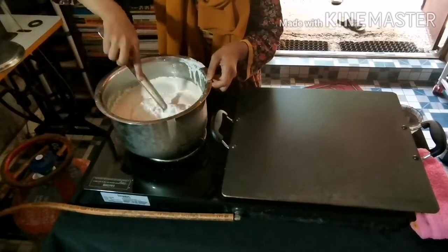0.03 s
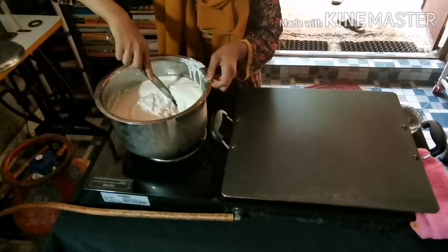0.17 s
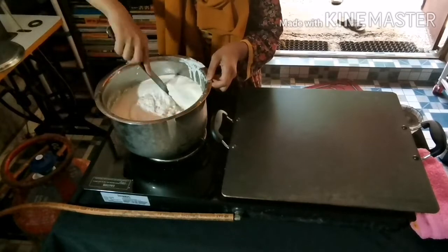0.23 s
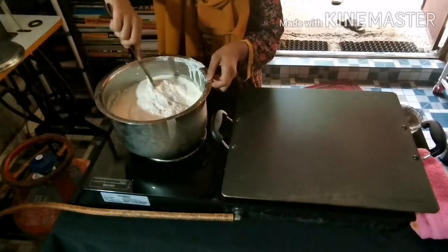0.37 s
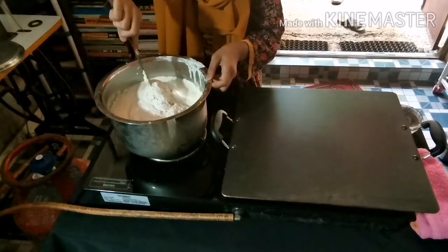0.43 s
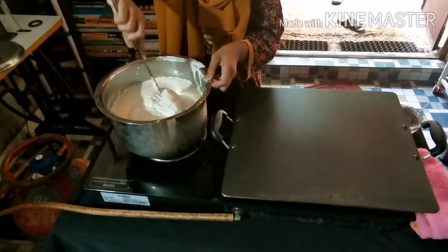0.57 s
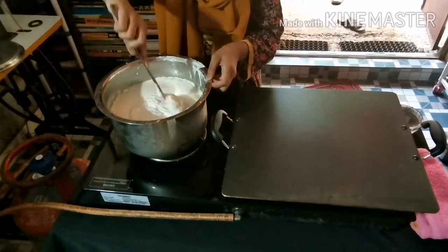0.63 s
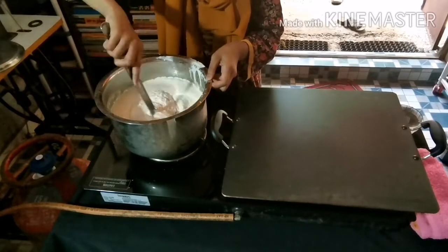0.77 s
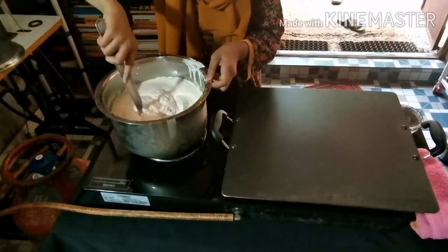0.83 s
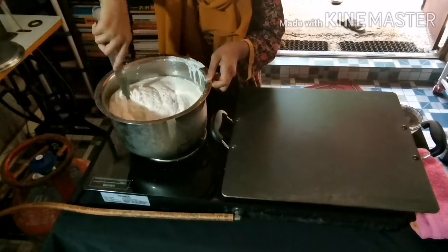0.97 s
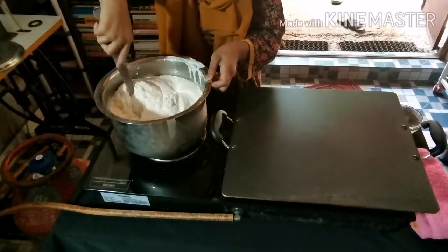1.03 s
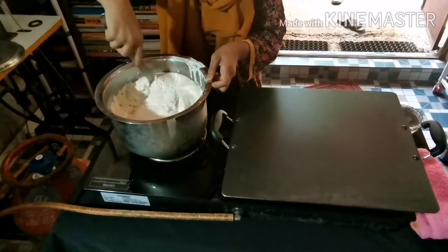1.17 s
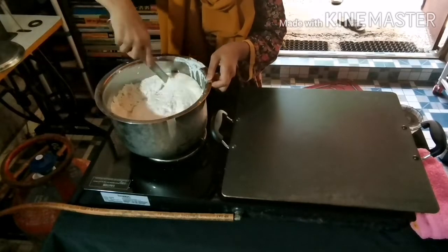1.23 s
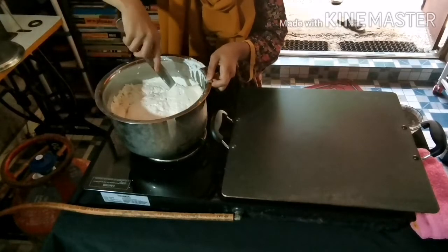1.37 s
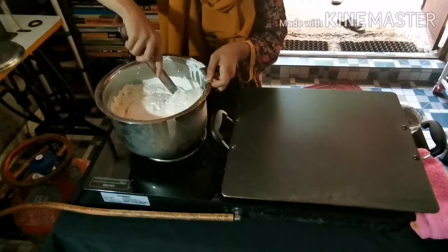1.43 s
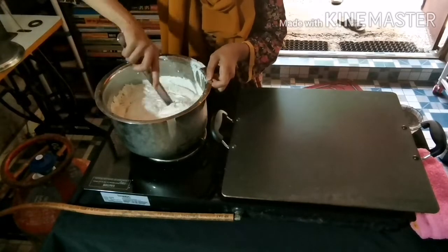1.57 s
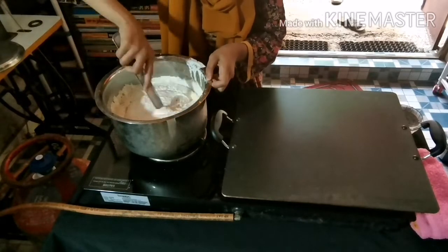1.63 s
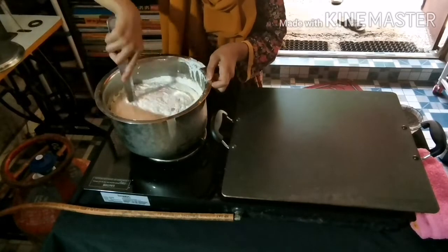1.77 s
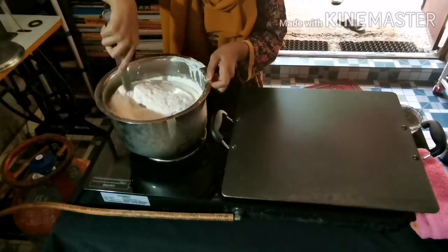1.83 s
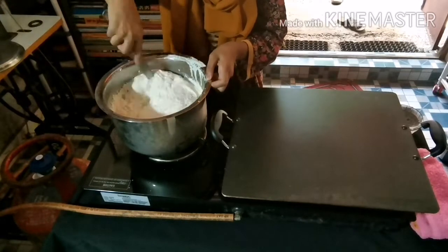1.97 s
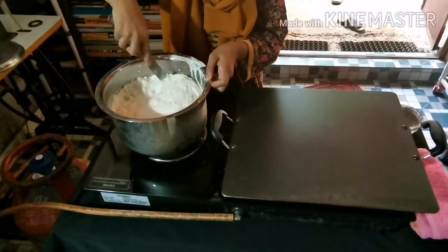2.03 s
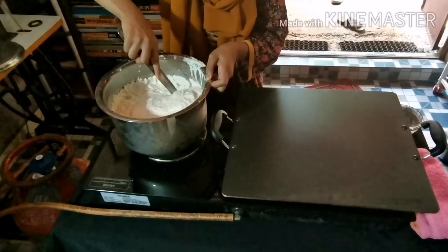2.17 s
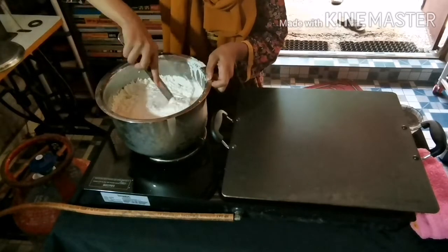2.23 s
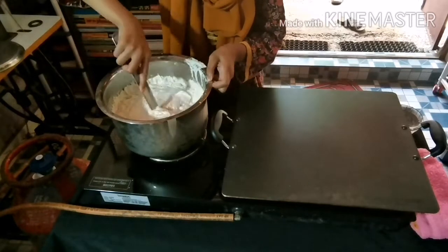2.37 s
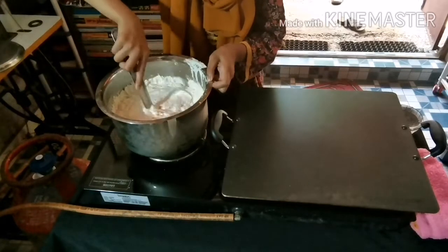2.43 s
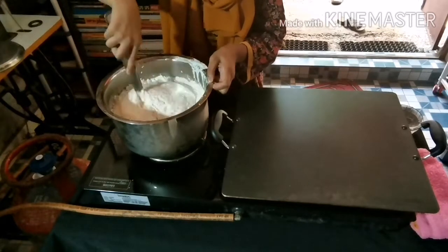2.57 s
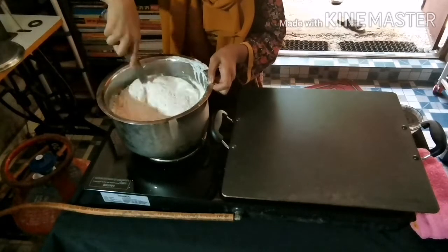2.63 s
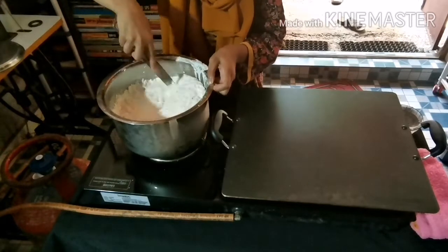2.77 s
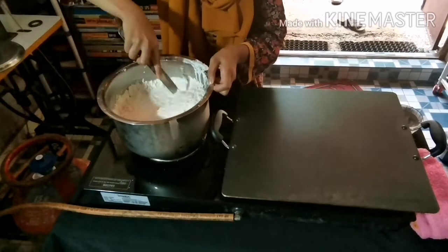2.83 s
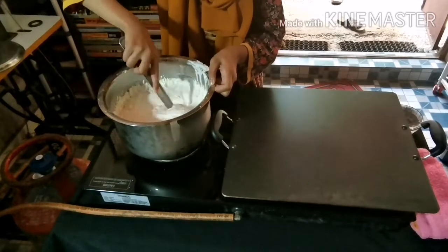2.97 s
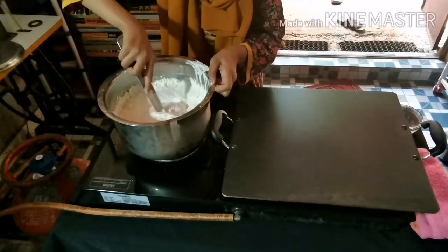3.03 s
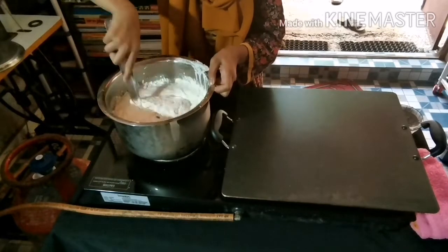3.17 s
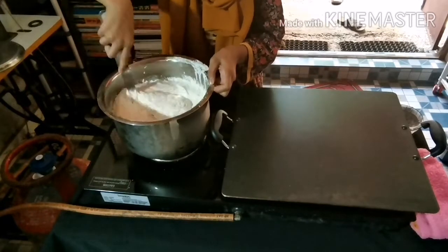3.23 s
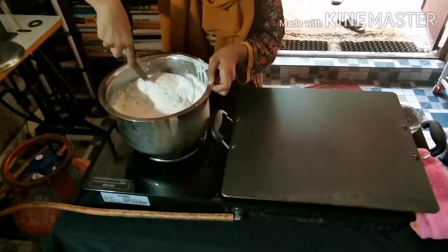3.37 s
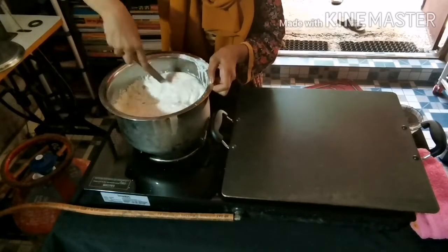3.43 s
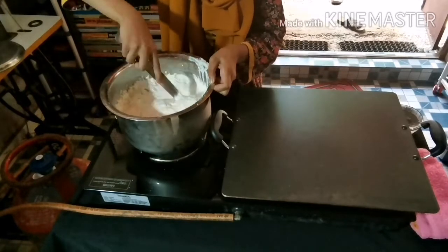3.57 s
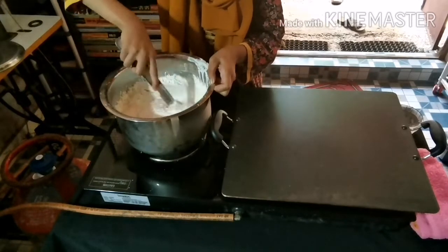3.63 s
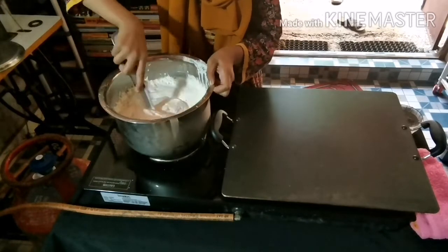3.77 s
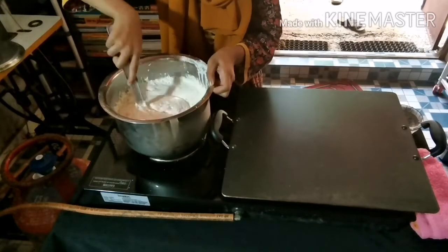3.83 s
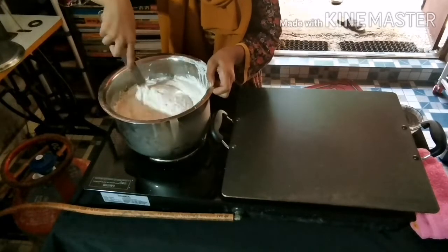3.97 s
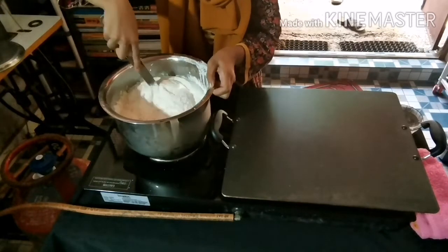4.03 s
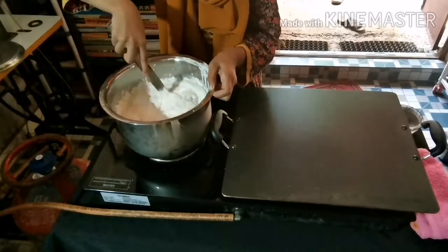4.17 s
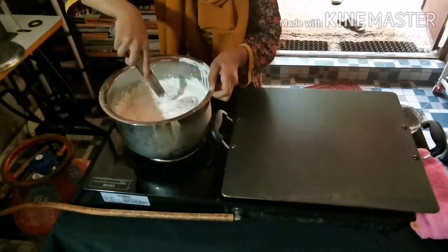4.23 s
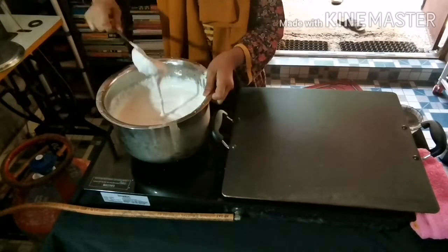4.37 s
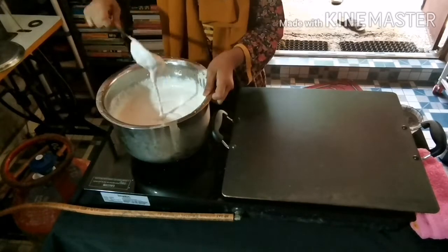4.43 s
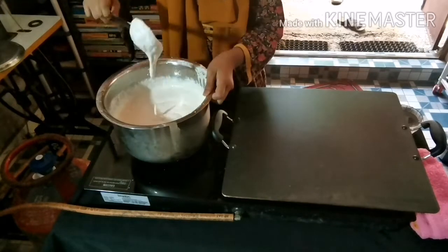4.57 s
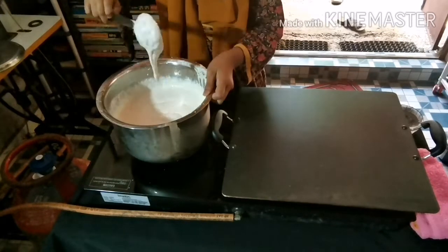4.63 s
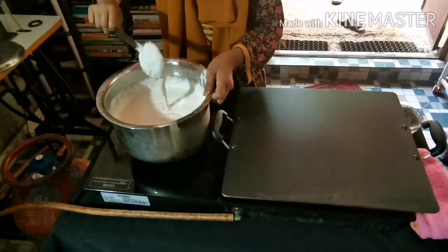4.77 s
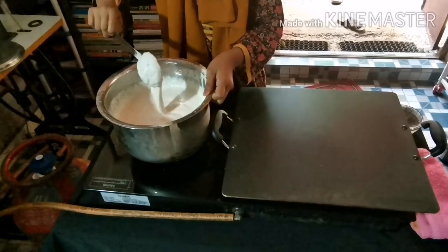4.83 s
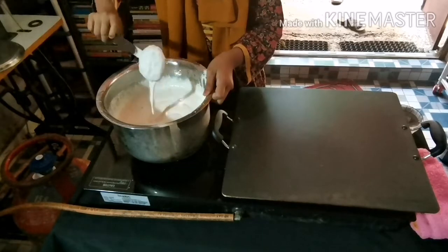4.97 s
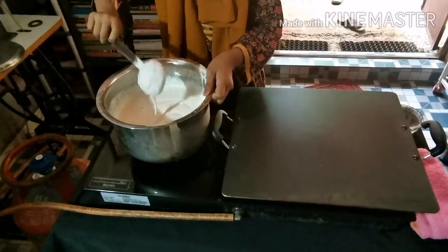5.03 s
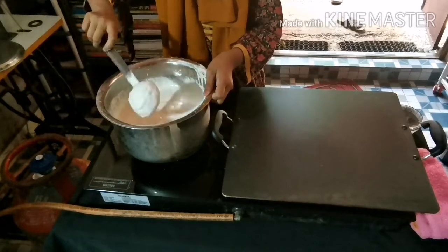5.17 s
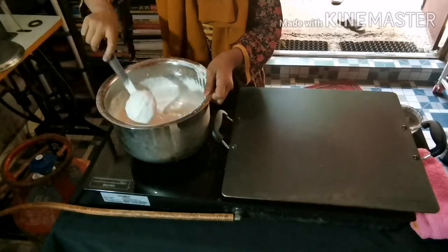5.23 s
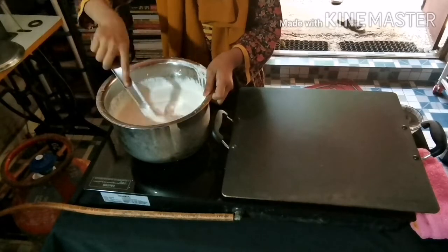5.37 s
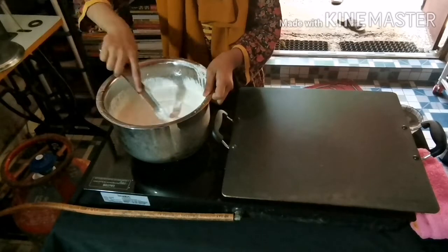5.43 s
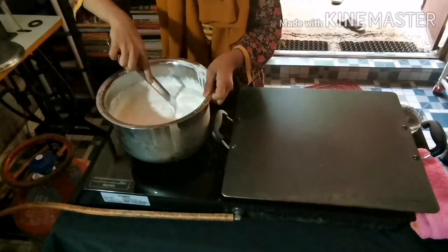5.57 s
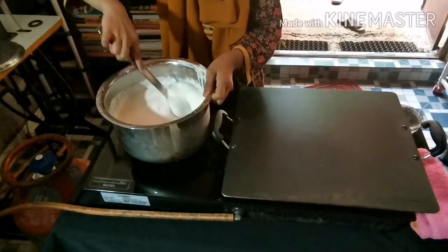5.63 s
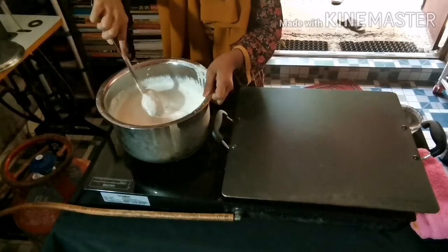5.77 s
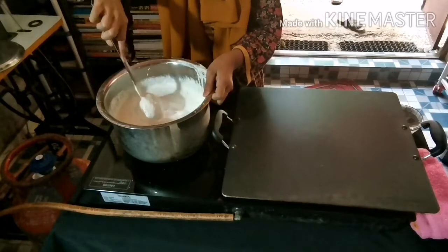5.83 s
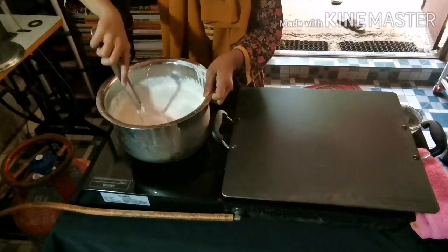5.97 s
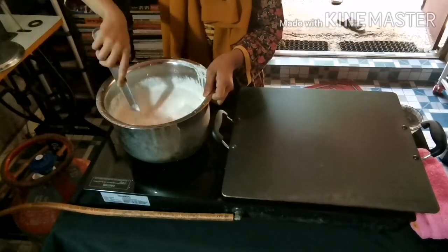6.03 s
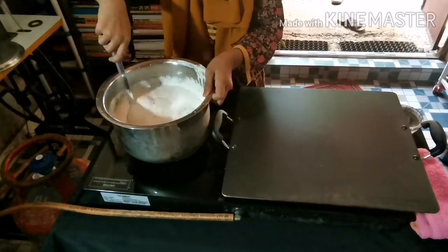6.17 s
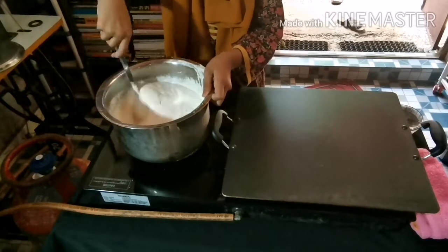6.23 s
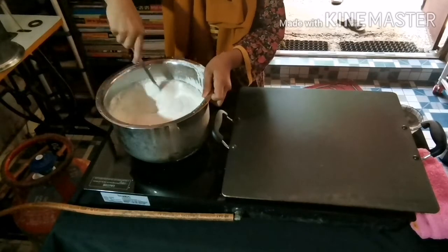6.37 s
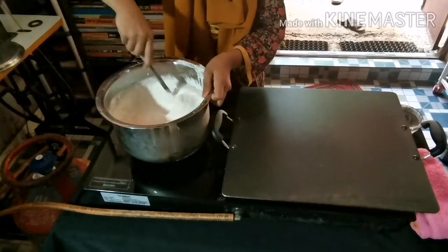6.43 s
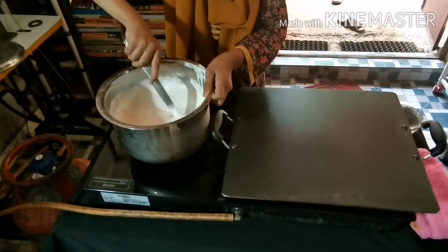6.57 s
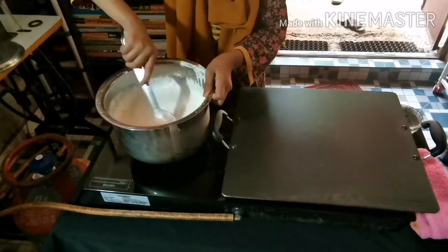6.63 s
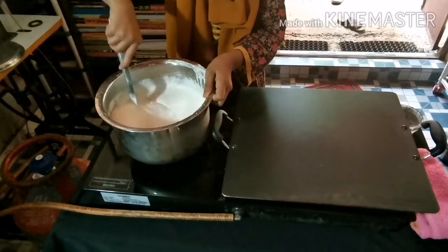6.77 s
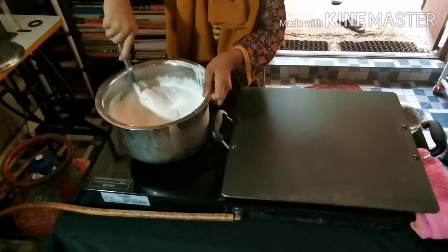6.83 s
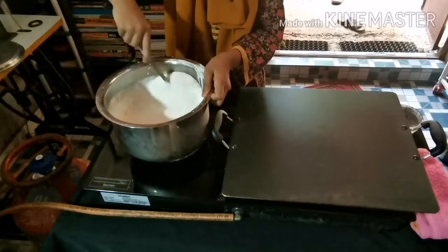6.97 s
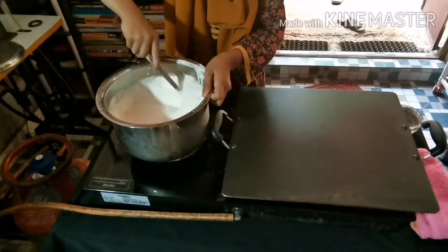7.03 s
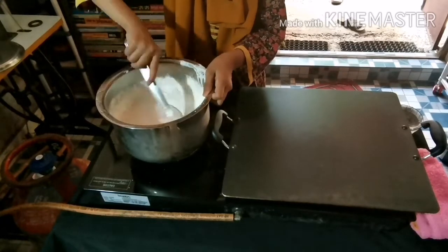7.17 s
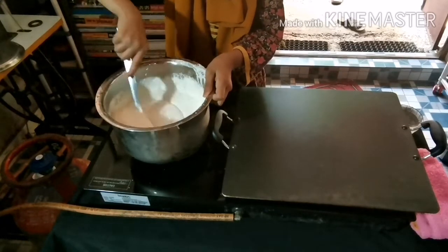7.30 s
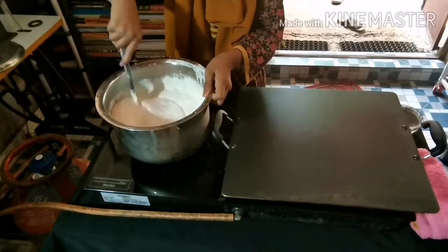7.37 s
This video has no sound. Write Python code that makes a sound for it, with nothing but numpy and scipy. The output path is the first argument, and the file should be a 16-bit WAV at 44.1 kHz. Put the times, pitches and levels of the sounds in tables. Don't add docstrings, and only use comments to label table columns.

```python
import sys
import numpy as np
from scipy import signal
from scipy.fft import rfft, irfft, next_fast_len
from scipy.io import wavfile
from scipy.ndimage import uniform_filter1d, map_coordinates

SR = 44100
rng = np.random.default_rng(int(sys.argv[2]) if len(sys.argv) > 2 else 0)


def volts_from_db(level):
    exponent = np.asarray(level, float) / 20
    return 10 ** exponent


def persist_wave(psi):
    counts = np.round(np.clip(psi, -1, 1) * 32767).astype(np.int16)
    wavfile.write(sys.argv[1], SR, np.atleast_2d(counts).T)


N = 327042

BLOW_HZ = [190, 550, 1150, 2300, 4500]
# f/Hz, level struck low/dB, level struck high on the free wall/dB, t60/s
POT = [(134, -4, 1.5, 0.15), (166, 4, -18, 0.075), (221, 3, -18, 0.062), (283, 3.5, 0, 0.038),
       (336.5, -3, -1.5, 0.097), (433, 1, -18, 0.023), (462.7, -1, -4, 0.032), (551, 0.5, -21, 0.038),
       (651, 2, 3, 0.04), (758, 5, -10, 0.025), (894.5, 4.5, 5, 0.028), (984, 2.5, -13, 0.042),
       (1035, 1, -26, 0.12), (1145, 2.5, 0.5, 0.024), (1229, -2, 1, 0.068), (1491, -11.5, -5, 0.053),
       (1574, -16, 7, 0.017), (1787, -3, -22, 0.02), (2050, -3, 2.5, 0.021), (2153, 3.5, -0.5, 0.035),
       (2284, 6.5, -4.5, 0.023), (2667, -6, 1.5, 0.021), (3060, -45, 8, 0.01), (3453, -12, 5, 0.019),
       (3554, -0.5, -21, 0.032), (3885, -8.5, 19, 0.014), (4530, -24, -4, 0.015), (4840, 0.5, -43, 0.015)]
# f/Hz, likeness (1 = same)
ALIKE = [(60, 1), (130, 1), (290, 0.87), (640, 0.69), (1400, 0.042), (4000, 0.042)]


def blows():
    # f/Hz, level/dB
    crack_colour = [(70, -11.5), (150, -5), (600, 11.5), (2300, -2.5), (4600, -1.5), (6200, -6.5),
                    (11000, -12.5), (14000, -21), (15400, -31), (16400, -46)]
    out = np.zeros((2, N + SR))
    t = np.arange(SR // 5) / SR
    hz, low_db, high_db, t60 = np.transpose(POT)[:, :, None]
    grid = np.fft.rfftfreq(2048, 1 / SR)
    small = signal.butter(3, 128, "high", fs=SR, output="sos")
    for s, *part_db in strikes():
        strike = list(zip(BLOW_HZ, part_db))
        height = np.clip((part_db[1] - part_db[0] - 7) / 9, 0, 1)
        touch = np.clip(0.00019 * volts_from_db(0.92 * (max(part_db) - part_db[-1])), 0, 0.003) + 0.0005 * height

        luck = rng.standard_normal((3, len(POT), 1))
        level_db = low_db + height * (high_db - low_db) + 1.8 * luck[0]
        fade = volts_from_db(along(strike, hz) - 1.5 + level_db - 60 * t / t60) * (1 - np.exp(-t / touch))
        phase = luck[2] * np.minimum(touch * hz * 2.25 + height * 5.3, 1.5)
        steps = np.repeat(rng.standard_normal((len(POT), 70)), 126, axis=1)
        phase = phase + np.cumsum(steps, axis=1) * hz / SR * 0.5
        ring = np.sum(fade * np.sin(2 * np.pi * hz * (1 + luck[1] / 80) * t + phase), axis=0)

        burst = volts_from_db(-60 * t / 0.013) + volts_from_db(-17.5 - 60 * t / 0.015)
        chatter = rfft(rng.standard_normal((2, len(t))) * burst)
        even = paired(irfft(chatter / np.abs(chatter), len(t)), ALIKE) * volts_from_db(-60 * t / 0.069)
        grit = ((t == 0) * 0.28 * (1 - height) + even) * volts_from_db(-4 * height)
        contact = causal(along(strike, grid) + along(crack_colour, grid) + 31)
        crack = signal.fftconvolve(grit, contact[None], axes=1)

        hit = signal.sosfilt(small, ring + crack[:, :len(t)])
        hit = signal.fftconvolve(hit, causal(blow_colour(s, grid))[None], axes=1)[:, :len(t)]
        sound = kitchen(hit[0])
        sound[:, :len(t)] += hit
        out[:, round(s * SR):][:, :sound.shape[1]] += sound
    return out[:, :N]


def strikes():
    # t/s, ring level/dB, bottom thump over ring/dB, lean from belly to rim/dB a part,
    # contact crack over ring/dB
    knocks = [(0.1937, -38.5, 10, 0.5, -21), (1.0654, -49.5, 9.5, -1, -10.5),
              (1.2336, -28.5, -9, -0.5, 2.5), (2.0344, -32.5, -4.5, -4, 2.2),
              (2.2695, -28.5, -26, 3.5, -14.5), (2.6562, -46.5, 3.5, -5, -23), (2.7595, -39, 5.5, -3, 4.5),
              (3.1542, -43.5, -2.7, -4.5, -33), (3.3488, -47.5, 15.5, -8, -27), (3.4899, -28.5, 1.5, 0, 1),
              (3.7231, -53.5, 13.5, -3, -18), (4.0933, -29, -37, -0.2, -36), (4.1382, -36, -3, -7, -33),
              (5.5007, -56, 3, -2, -4), (6.0903, -41, 12, -7.5, -35), (6.2397, -30, -13.5, 2.7, -19),
              (6.503, -25.5, 3, -2, -3.5), (6.5484, -31.5, -8.5, -2.5, -12), (6.8489, -41, 0, 11, 9.5),
              (6.8523, -25, 2.8, 2.7, -10), (6.9171, -29, -13.5, -1.3, -14.5),
              (7.054, -24.5, -3.5, -5, -5.5), (7.1019, -24.5, -17.5, 5, -13.5)]
    # t/s, level/dB, loudest f/Hz, fall an octave away/dB
    touches = [(0.0344, -53.5, 4700, 11.5), (0.8867, -57.5, 960, 3.5), (1.527, -58, 190, 4),
               (1.6662, -60, 4500, 4.5), (1.7636, -52, 810, 4.5), (1.9228, -40.5, 480, 11.5),
               (1.969, -51.5, 900, 4), (2.219, -40.5, 190, 15), (2.7121, -49.5, 700, 6),
               (2.9053, -45.5, 190, 9), (3.0481, -52, 192, 4.5), (3.2806, -53, 1300, 11),
               (3.3896, -43, 190, 5.5), (3.4382, -37, 700, 14), (3.5132, -44.5, 190, 1),
               (3.8914, -38, 533, 18), (3.949, -46.5, 870, 13.5), (4.0686, -32.5, 190, 18),
               (4.2933, -56, 4500, 9.5), (4.768, -46, 4000, 4.5), (4.9137, -46, 1900, 6.5),
               (5.115, -56, 4500, 7.5), (5.3, -56.5, 4500, 6), (5.3753, -55, 4500, 8),
               (5.766, -57, 900, 7.5), (5.9974, -42, 443, 11.5), (6.7942, -57, 400, 3.5),
               (7.1562, -41, 190, 4), (7.352, -55, 190, 4)]
    wall_dip_db, dip_per_lean = -3.5, 0.37
    full = [(s, db + thump, db - lean, db + wall_dip_db + dip_per_lean * lean, db + lean, db + crack)
            for s, db, thump, lean, crack in knocks]
    light = []
    for s, db, hz, fall in touches:
        octaves_away = np.abs(np.log2(np.divide(BLOW_HZ, hz)))
        light.append((s, *(db - fall * octaves_away)))
    return full + light


def blow_colour(s, hz):
    # blow t/s, f/Hz, level/dB
    spots = [(0.1937, 300, 12), (0.1937, 2610, -12), (1.2336, 400, -6), (1.2336, 570, -6), (1.2336, 870, 8),
             (1.2336, 2470, 7), (2.0344, 200, 10), (2.0344, 400, -6), (2.0344, 670, 8), (2.0344, 1230, -6),
             (2.2695, 420, -9), (2.2695, 1600, 7), (2.2695, 3110, -5), (2.2695, 4530, -6),
             (2.7595, 320, -8), (2.7595, 390, 10), (2.7595, 800, -11), (2.7595, 1470, -13),
             (3.1542, 250, 8), (3.1542, 370, -15), (3.1542, 760, 6), (3.4899, 220, 7), (3.4899, 410, -7),
             (3.4899, 570, -6), (3.4899, 1160, 6), (4.0933, 450, 7), (4.0933, 1040, -7), (5.5007, 200, 7),
             (5.5007, 290, -10), (5.5007, 900, -11), (5.5007, 1310, 11), (6.0903, 210, 11),
             (6.0903, 270, -7), (6.0903, 730, 9), (6.0903, 920, 7), (6.2397, 490, -8), (6.2397, 3600, 6),
             (6.503, 410, 7), (6.503, 570, -6), (6.503, 2020, -5), (6.5484, 220, -7), (6.5484, 400, -6),
             (6.5484, 1470, 11), (6.8523, 450, -8), (6.8523, 670, 6), (6.8523, 1160, 8), (6.8523, 1350, -8),
             (6.9171, 450, 10), (6.9171, 600, -9), (6.9171, 900, -6), (6.9171, 2260, -8), (7.054, 220, 7),
             (7.054, 400, 4), (7.054, 650, -5), (7.054, 4030, 5), (7.1019, 270, -6), (7.1019, 630, 9),
             (7.1019, 820, -5)]
    # blow t/s, f/Hz, level/dB
    narrow_spots = [(0.1937, 1350, 6), (0.1937, 2300, 7), (0.1937, 2540, -8), (0.1937, 3020, 8),
                    (1.2336, 3800, 5), (1.2336, 4400, -6), (1.2336, 4790, 6), (2.0344, 1450, 9),
                    (2.0344, 1820, -7), (2.0344, 2360, 7), (2.0344, 2930, -10), (2.0344, 4330, -6),
                    (2.0344, 4900, 6), (2.2695, 1270, 6), (2.2695, 3860, 10), (2.2695, 5150, 9),
                    (2.7595, 2110, 6), (2.7595, 2930, -6), (2.7595, 4150, -6), (3.4899, 1380, -8),
                    (3.4899, 1740, -7), (3.4899, 2890, -10), (3.4899, 4500, 9), (4.0933, 1740, 5),
                    (4.0933, 1990, -6), (4.0933, 2330, 8), (4.0933, 2540, -6), (4.0933, 3810, -10),
                    (4.1382, 1900, -9), (5.5007, 5080, -9), (6.0903, 1370, 10), (6.0903, 1820, -8),
                    (6.2397, 1650, 10), (6.2397, 3200, 7), (6.2397, 5150, 9), (6.503, 4400, 6),
                    (6.5484, 1330, 5), (6.5484, 2140, 6), (6.5484, 2400, -7), (6.8523, 1250, 6),
                    (6.8523, 1380, -6), (6.8523, 1670, 9), (6.8523, 2470, -5), (6.8523, 2730, 11),
                    (6.8523, 4800, 9), (6.9171, 1510, 8), (6.9171, 2580, -6), (6.9171, 2850, 7),
                    (7.054, 2610, -5), (7.054, 2850, 6), (7.1019, 1650, 7), (7.1019, 2690, 7),
                    (7.1019, 2930, -6)]
    regions = [(*row, 0.16) for row in spots] + [(*row, 0.085) for row in narrow_spots]
    near = [row[1:] for row in regions if abs(row[0] - s) < 0.006]
    return sum(db * np.exp(-0.5 * (np.log2((hz + 1) / c) / width) ** 2) for c, db, width in near) + 0 * hz


def sweet_rings():
    # t/s, f/Hz, level/dB, t60/s
    sweet = [(1.2335, 282, -36.5, 0.29), (1.2336, 780, -38, 0.26), (1.2337, 1100, -25, 0.086),
             (2.0341, 299, -36, 0.29), (2.2678, 2660, -29, 0.022), (2.2694, 699, -17, 0.031),
             (3.2811, 1420, -44, 0.048), (3.4903, 413, -29, 0.035), (4.1362, 467, -27, 0.06),
             (6.2386, 714, -25.5, 0.034), (6.2395, 2650, -26, 0.02), (6.853, 1390, -17.5, 0.04),
             (6.858, 4264, -33, 0.05), (6.8505, 3564, -30, .03), (6.503, 2330, -30, .03),
             (6.5105, 3400, -35, .02), (6.525, 2400, -33, .02), (6.543, 2750, -33, .02),
             (6.2405, 2150, -29, .03), (2.2745, 2190, -29, .04), (2.2695, 3350, -36, .02),
             (1.726, 900, -52, .03), (1.764, 950, -45, .03), (1.845, 680, -47, .07), (1.893, 800, -48, .05),
             (1.923, 760, -40, .03), (1.943, 640, -46, .04), (1.974, 720, -46, .03), (4.105, 700, -34, .03),
             (4.146, 2200, -39, .02), (4.18, 750, -39, .03), (4.197, 520, -38, .03),
             (3.4905, 4950, -38, .05), (3.4905, 2300, -33, .05), (2.0345, 3600, -40, .05),
             (2.712, 800, -44, .02), (1.0645, 900, -45, .02), (6.9175, 1155, -25, 0.035),
             (7.0548, 1010, -40, .04), (7.1023, 2220, -27, 0.021)]
    out = np.zeros(N + SR)
    t = np.arange(SR // 4) / SR
    for s, hz, db, t60 in sweet:
        fade = volts_from_db(db - 60 * t / t60) * (1 - np.exp(-t / 0.00063))
        out[round(s * SR):][:len(t)] += fade * np.sin(2 * np.pi * hz * t)
    return out[:N] + kitchen(out[:N])[:, :N]


def thuds():
    # t/s, level/dB, pitch f/Hz, ring length as a share of the grate's
    dull_blows = [(1.0651, -32.5, 121, .9), (2.219, -54, 152, .9), (2.6578, -27.5, 120.7, .9),
                  (3.1565, -36, 128, .9), (3.3907, -47, 165, .9), (4.0685, -25.5, 150, .45),
                  (5.4983, -38.5, 132.6, .9), (6.091, -27.5, 178, .9), (7.176, -34, 117, .9),
                  (7.352, -44, 124, .9)]
    # multiple of the pitch, level/dB, t60/s
    grate = [(.8, -5, 0.075), (1.02, 2.8, 0.12), (1.3, -18, .06)]
    out = np.zeros(N + SR)
    t = np.arange(SR // 4) / SR
    for s, db, hz, length in dull_blows:
        note = sum(volts_from_db(level - 60 * t / (t60 * length)) * np.sin(2 * np.pi * k * hz * t)
                   for k, level, t60 in grate)
        out[round(s * SR):][:len(t)] += volts_from_db(db) * (1 - np.exp(-t / (0.0068 * length))) * note
    out = signal.sosfilt(signal.butter(3, 88, "high", fs=SR, output="sos"), out[:N])
    return out + 0.69 * kitchen(out)[:, :N]


def drag():
    # start t/s, hold t/s, level/dB
    grinds = [(0.177, 0.03, -51.5), (1.246, .02, -47), (1.502, 0.048, -60.5), (1.74, 0.049, -60),
              (1.914, 0.027, -59), (2.075, 0.15, -58), (2.796, .02, -53.5), (3.353, 0.021, -41.5),
              (3.62, .03, -62), (3.733, 0.018, -46), (4.805, 0.018, -55.5), (5.15, 0.12, -68),
              (6.045, .02, -61), (6.293, 0.2, -62.5), (6.595, 0.1, -58), (6.91, 0.017, -53),
              (7.06, 0.074, -50)]
    # start t/s, hold t/s, level/dB, hiss over the drag/dB
    drags = [(0.097, 0.04, -60, -4), (0.212, 0.019, -53, -15), (0.484, 0.077, -67, -4),
             (0.867, 0.099, -62, -5), (1.062, 0.082, -52, -9), (1.333, 0.029, -55.5, -7),
             (1.736, 0.14, -55, -15), (1.856, .13, -52, -14), (2.112, 0.042, -57, -11),
             (2.351, .02, -50.5, -4.5), (2.47, 0.15, -66.5, 3), (2.878, 0.041, -53.5, -20),
             (3.164, 0.2, -50.5, -21), (3.596, 0.035, -54, -7), (3.847, 0.023, -59.5, -10),
             (4.119, 0.011, -39.5, -16), (4.396, 0.049, -59, -17), (4.588, 0.21, -68, 11),
             (4.928, .02, -64, -6), (5.15, .18, -74, 6.5), (6.155, 0.082, -64.5, -3),
             (6.348, 0.57, -66, -5), (6.898, 0.017, -46, -19), (7.17, .04, -66, -1), (7.27, .15, -63.5, -4)]
    # f/Hz, level/dB
    drag_colour = [(400, 0), (660, 3.5), (1300, 0), (1750, -5.5), (2200, -1)]
    press_db_per_s, ease_db_per_s = 329, 124
    out = np.zeros(N)
    # lowest Hz, highest Hz, width of the resonances, slips a second
    parts = ((99, 484, 0.16, 320), (376, 1820, 0.24, 400), (1150, 2800, 0.98, 2300))
    start, hold, db, hiss_db = np.transpose(drags)
    pressed = [np.transpose(grinds), (start, hold, db), (start, hold, db + hiss_db)]
    for rows, (lo_hz, hi_hz, width, rate) in zip(pressed, parts):
        jerk_size = volts_from_db(1.26 * np.minimum(rng.exponential(size=N), 2))
        slips = (rng.random(N) < rate / SR) * rng.standard_normal(N) * jerk_size
        rub = unit(slips) + 0.23 * rng.standard_normal(N)
        response = pot_response(lo_hz, hi_hz, width)

        def steep(f):
            edges = (1 + (lo_hz / (f + 1)) ** 4) * (1 + (f / hi_hz) ** 4)
            return response(f) * volts_from_db(along(drag_colour, f)) / edges

        pressure = gestures(*rows, press_db_per_s, ease_db_per_s)
        out += pressure * volts_from_db(-5.0 + 1.8 * wobble(25)) * unit(filtered(rub, steep))
    return out + kitchen(out)[:, :N]


def pot_response(lo_hz, hi_hz, width):
    part = [(c, db) for c, db, *_ in POT if lo_hz < c < hi_hz]
    return lambda f: sum((-1) ** k * volts_from_db(db) * 1j * f * width * c / (c * c - f * f + 1j * f * width * c)
                         for k, (c, db) in enumerate(part))


def squeals():
    # start t/s, end t/s, first f/Hz, last f/Hz, level/dB
    tones = [(0.292, 0.683, 3050, 2980, -70.5), (0.838, 1.072, 2110, 2030, -64.5),
             (0.912, 1.054, 2990, 2940, -73), (1.546, 1.78, 2245, 2285, -71), (2.515, 2.636, 620, 590, -60),
             (4.167, 4.264, 460, 409, -52.5), (4.28, 4.345, 650, 656, -51), (4.378, 4.492, 668, 687, -55),
             (6.883, 7.037, 54.7, 55, -54), (1.26, 1.44, 2300, 2330, -70), (3.25, 3.45, 3580, 3600, -68),
             (3.63, 3.72, 3600, 3580, -72), (4.35, 4.44, 2150, 2130, -72)]
    out = np.zeros(N)
    t = np.arange(N) / SR
    for start, end, first_hz, last_hz, db in tones:
        grip = np.clip(0.7 * wobble(55) + 0.7, 0.1, 1.2)
        swell = np.clip(np.minimum(t - start, end - t) / 0.019, 0, 1) * volts_from_db(db) * grip
        pitch = np.interp(t, [start, end], [first_hz, last_hz]) * (1 + 0.017 * wobble(120))
        out += swell * np.sin(2 * np.pi * np.cumsum(pitch) / SR)
    return out + 1.2 * kitchen(out)[:, :N]


def sleeve():
    # start t/s, hold t/s, level/dB, fizz over the swish/dB
    slides = [(0, 0.067, -56, -5.5), (0.134, 0.18, -63.5, -10), (0.287, 0.16, -59.5, -5),
              (0.541, .11, -60.5, -2.5), (.87, 0.11, -61, -7), (1.065, .3, -63, 0.5),
              (1.41, 0.64, -67.5, 1.3), (2.056, .22, -67, -1.5), (2.319, 0.19, -59, -2.5),
              (2.707, .2, -67, -0.5), (3.14, 0.17, -66.5, 1.5), (3.416, 0.4, -69, -2.5),
              (3.797, 0.096, -63.5, 3), (4.11, 0.2, -66, -5.5), (4.382, 0.15, -76, -8),
              (4.542, .21, -62.5, -7.5), (4.779, 0.038, -46, -13.5), (5.06, .04, -68, -11),
              (4.7, .07, -60, -10), (0.42, .04, -72, 8), (5.766, .05, -71, -5), (5.87, .04, -75, 3),
              (6.104, 0.77, -73, 2.5), (6.75, 0.64, -74.5, 5)]
    # t/s, level/dB, fizz over the swish/dB
    flicks = [(1.664, -70.5, 10), (1.708, -60.5, -14), (2.614, -56, -9), (3.054, -78.5, 14.5),
              (3.346, -55, -6.5), (4.296, -62.5, 3), (4.916, -53, -6.5), (5.119, -56.5, -6.5),
              (5.308, -58, -6), (5.379, -56, -12), (5.5, -61, -12)]
    # f/Hz, level per Hz/dB
    swish_colour = [(1300, -23), (2500, -3), (4200, 0.5), (5200, -3), (6200, -45)]
    # f/Hz, level per Hz/dB
    fizz_colour = [(4400, -44), (5500, -2), (8500, -3), (10500, -1.5), (13000, -10), (15500, -17.5)]
    start, hold, db, fizz_db = np.transpose(slides)
    snap, snap_db, snap_fizz_db = np.transpose(flicks)

    def arm(slide_extra_db, snap_extra_db):
        sliding = gestures(start, hold, db + slide_extra_db, 600, 380)
        snapping = gestures(snap, 0, snap_db + snap_extra_db, 1200, 188)
        return np.hypot(sliding, snapping)

    folds = volts_from_db(0.56 * wobble(12))
    swish = folds * arm(0, 0) * volts_from_db(-3.0 + 1.3 * wobble(60)) * rush(swish_colour)
    fizz = folds * arm(fizz_db, snap_fizz_db) * volts_from_db(-1.0 + 1.54 * wobble(60)) * rush(fizz_colour)
    return patchy(swish + fizz, depth_db=1.6)


def steady_hush():
    # f/Hz, level per Hz/dB
    hush = [(12, -27), (20, -7), (64, -8.5), (185, -12.5), (305, -14.5), (612, -20.5), (665, -18.5),
            (1530, -25), (2600, -28.5), (4790, -31), (5660, -39), (10700, -37), (15400, -47)]
    return volts_from_db(-62.5 + 2.0) * rush(hush)


def kitchen(x, gap=0.0029):
    # f/Hz, t60/s
    ring_time = [(100, 0.73), (260, 0.29), (700, 0.26), (1840, 0.25), (4850, 0.24), (12800, 0.28)]
    # f/Hz, level/dB
    wet = [(100, -15.5), (300, 4), (1000, -1), (4000, 1), (12000, -2.5)]
    hz, t, z = signal.stft(rng.standard_normal((2, SR // 2)), SR, nperseg=256)
    t60 = along(ring_time, hz)[:, None]
    z = z * volts_from_db(along(wet, hz)[:, None] - 60 * t / t60) / np.sqrt(t60)
    tail = paired(signal.istft(z, SR, nperseg=256)[1], ALIKE)[:, :SR // 2]
    tail = tail * np.clip(np.arange(SR // 2) / SR / gap - 0.5, 0, 1) * 0.023
    return signal.fftconvolve(x[None], tail, axes=1)


def rush(spectrum):
    # f/Hz, likeness (1 = same)
    noise_alike = [(60, 0.099), (300, 0.35), (700, 0.19), (1400, .02)]
    closed = [(1, -120), (spectrum[0][0] * 0.8, -60), *spectrum, (spectrum[-1][0] * 1.1, -90)]
    noise = filtered(rng.standard_normal((2, N)), lambda hz: volts_from_db(along(closed, hz)))
    return unit(paired(noise, noise_alike))


def gestures(start, hold, db, rise_db, fall_db):
    t = np.arange(0, N + 64, 64) / SR
    start, end = start[:, None], (start + hold)[:, None]
    gain = volts_from_db(db[:, None] - rise_db * np.clip(start - t, 0, None) - fall_db * np.clip(t - end, 0, None))
    return np.interp(np.arange(N) / SR, t, np.sqrt(np.sum(gain ** 2, axis=0)))


def patchy(x, depth_db):
    z = signal.stft(x, nperseg=512)[2]
    field = uniform_filter1d(rng.standard_normal(z.shape[1:]), size=22, axis=0)
    field = uniform_filter1d(field, size=9, axis=1)
    return signal.istft(z * volts_from_db(depth_db * unit(field)), nperseg=512)[1][:, :N]


def wobble(rate):
    return map_coordinates(rng.standard_normal(int(N * rate / SR) + 4), [np.arange(N) * rate / SR])


def paired(pair, alike):
    def turn(hz):
        return np.arccos(np.clip(along(alike, hz), -1, 1)) / 2

    mid, side = filtered(pair, lambda hz: np.array([np.cos(turn(hz)), np.sin(turn(hz))]))
    return np.array([mid + side, mid - side])


def filtered(x, response):
    m = next_fast_len(x.shape[-1] + SR // 4)
    return irfft(rfft(x, m) * response(np.fft.rfftfreq(m, 1 / SR)), m)[..., :x.shape[-1]]


def causal(gain_db):
    cepstrum = irfft(np.log(volts_from_db(gain_db)))
    half = len(cepstrum) // 2
    cepstrum = cepstrum * np.r_[1, np.full(half - 1, 2), 1, np.zeros(half - 1)]
    return irfft(np.exp(rfft(cepstrum)))[:half]


def along(points, hz):
    f, v = np.transpose(points)
    return np.interp(np.log(hz + 1), np.log(f + 1), v)


def unit(x):
    return x / np.sqrt(np.mean(x ** 2) + 1e-20)


def scene():
    pot = blows() + sweet_rings() + thuds()
    spoon = drag() + squeals()
    return pot + spoon + sleeve() + steady_hush()


def roll_off(x):
    return signal.sosfilt(signal.butter(12, 16470, fs=SR, output="sos"), x)


def record(dry):
    right_lag = 4
    late = np.array([dry[0], np.roll(dry[1], right_lag)])
    return roll_off(late)


dry = scene()
out = record(dry)
persist_wave(out)
```